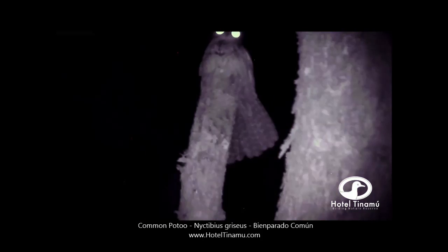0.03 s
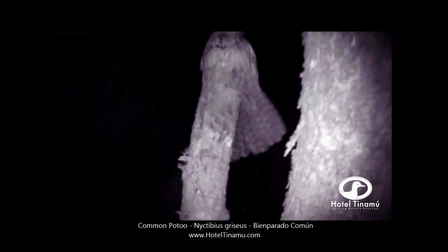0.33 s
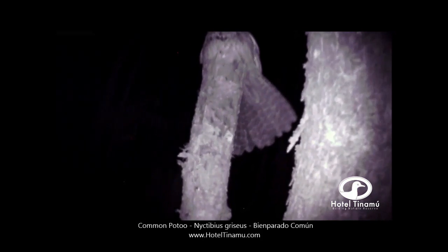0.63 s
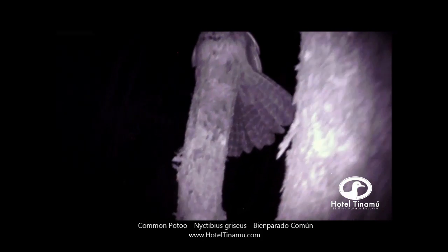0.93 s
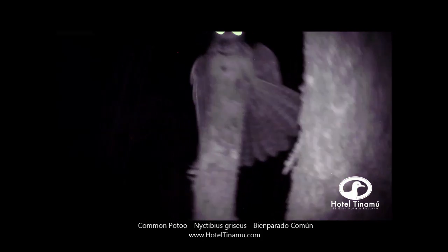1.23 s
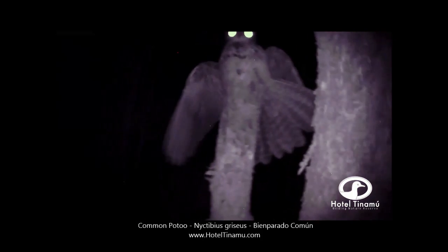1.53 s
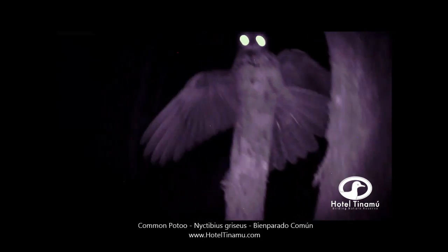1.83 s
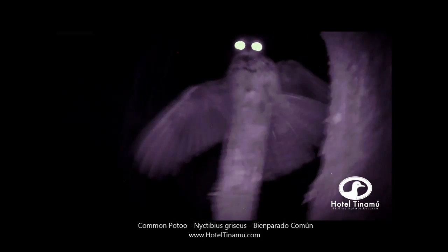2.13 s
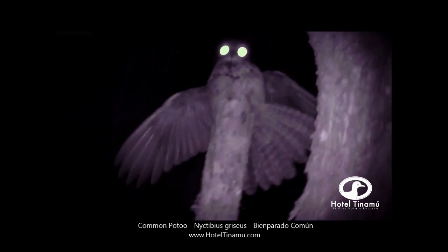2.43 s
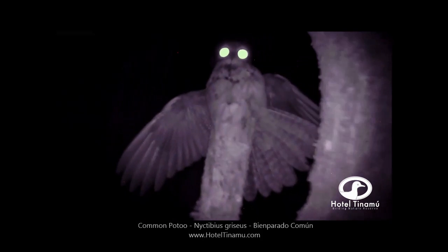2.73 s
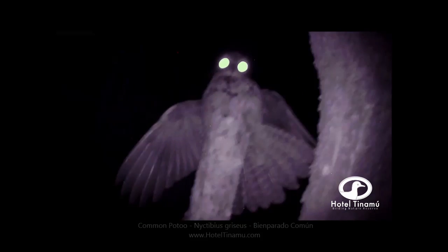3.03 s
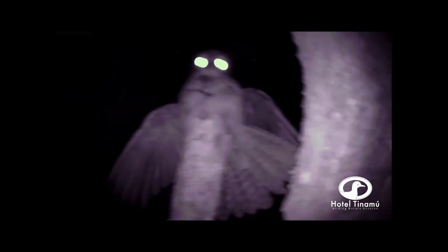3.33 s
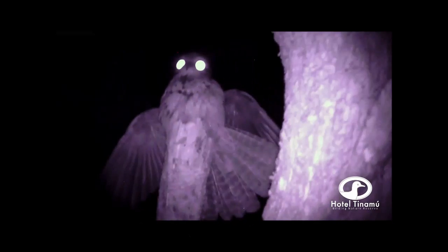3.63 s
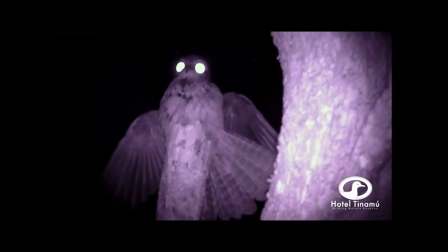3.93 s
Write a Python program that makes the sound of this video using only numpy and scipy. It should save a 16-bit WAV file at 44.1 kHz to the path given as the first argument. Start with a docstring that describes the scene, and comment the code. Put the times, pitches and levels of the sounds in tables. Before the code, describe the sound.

A night chorus of crickets and other insects, with trilling toads and soft microphone bumps.

```python
"""A tropical night. From the start, hiss, rumble and a chorus of far crickets lie under a near cricket's
chirps, a thin buzz, a tree cricket's lower trill, a scraping katydid and trilling toads. The insects
sing with their wings, and trees scatter the calls. Soon a hand starts to bump the camera softly, and
farther crickets chirp while the near one rests. Halfway, the toads stop and the tree cricket speeds up.
Then the near cricket chirps again, and at the end the buzz fades."""
import sys
import numpy as np
from scipy import signal
from scipy.fft import rfft, irfft, next_fast_len
from scipy.io import wavfile
from scipy.ndimage import uniform_filter1d, map_coordinates

SR = 44100
rng = np.random.default_rng(int(sys.argv[2]) if len(sys.argv) > 2 else 0)


def digitize_waveform(pressure):
    """Quantize a signal to 16-bit integers and store it at the path in sys.argv[1].

    Rows of a 2-D input are taken as channels; values are limited to [-1, 1].
    """
    field = np.atleast_2d(pressure).T
    bounded = np.clip(field, -1, 1)
    quanta = np.round(bounded * 32767).astype(np.int16)
    wavfile.write(sys.argv[1], SR, quanta)


N = 176400
TIME = np.arange(N) / SR


def amp(db):
    """Turn decibels into a number to multiply by."""
    return 10 ** (np.asarray(db) / 20)


def unit(x):
    """Scale a sound to an average strength (rms) of 1."""
    return x / np.sqrt(np.mean(x ** 2) + 1e-20)


def along(points, hz):
    """Read between the rows of a table on a musical (log) pitch scale."""
    pitches, values = np.transpose(points)
    return np.interp(np.log(hz + 1), np.log(pitches + 1), values)


def level(rows):
    """Join (time [s], level [dB]) points into a volume curve."""
    return amp(np.interp(TIME, *np.transpose(rows)))


def wobble(rate):
    """A smooth curve through `rate` random values a second."""
    return map_coordinates(rng.standard_normal(int(N * rate / SR) + 4), [TIME * rate])


def filtered(x, response):
    """Turn each frequency up or down by response(hz)."""
    size = next_fast_len(N + SR // 2)
    return irfft(rfft(x, size) * response(np.fft.rfftfreq(size, 1 / SR)), size)[..., :N]


# How alike left and right sound (frequency [Hz], likeness [0 to 1])
LIKENESS = [(100, 1), (300, 1), (2000, 1), (3000, 1), (4000, 1), (5500, 1), (7000, 0.37), (10000, 0.663),
            (15000, 0.765)]
def spread(pair):
    """Mix two unrelated sounds into stereo: centred low down, wider in the treble."""
    angle = lambda hz: np.arccos(np.clip(along(LIKENESS, hz), -1, 1)) / 2
    mid, side = filtered(pair, lambda hz: np.array([np.cos(angle(hz)), np.sin(angle(hz))]))
    return np.array([mid + side, mid - side])


def rush(spectrum):
    """Stereo noise with the given balance of lows and highs."""
    return unit(spread(filtered(rng.standard_normal((2, N)), lambda hz: amp(along(spectrum, hz)))))


def trees(x, echo_db, fade_s):
    """Trunks and leaves scatter a call into an echo that drops 60 dB in fade_s."""
    t = np.arange(SR) / SR
    tail = rng.standard_normal((2, SR)) * amp(-60 * t / fade_s) * (1 - np.exp(-t / .00207))
    echo = spread(signal.fftconvolve(x[None], tail, axes=1)[:, :N])
    return (x + amp(echo_db) * unit(echo) * np.std(x)) / np.hypot(1, amp(echo_db))


def pulses(times, hz, db, width_s, fall_hz, vary_db, vary_hz):
    """Tiny beeps that swell and fade, each a bit different; the pitch drops fall_hz per width_s."""
    t = np.arange(-int(3 * width_s * SR), int(3 * width_s * SR)) / SR
    size, tune, phase = rng.standard_normal((len(times), 3)).T
    cycles = (hz + vary_hz * tune)[:, None] * t - fall_hz * t ** 2 / (2 * width_s) + phase[:, None]
    wave = amp(db + vary_db * size)[:, None] * np.exp(-(t / width_s) ** 2) * np.sin(2 * np.pi * cycles)
    at = np.round((times[:, None] + t) * SR).astype(int)
    inside = (at >= 0) & (at < N)
    return np.bincount(at[inside], wave[inside], N)


def sine(hz):
    """A pure tone that follows a changing pitch."""
    return np.sin(2 * np.pi * np.cumsum(hz) / SR)


def whine(hz, waver_hz):
    """A thin tone that trembles in pitch and volume."""
    return unit(sine(hz + waver_hz * wobble(170)) * amp(3.96 * wobble(70)))


# The tone of the hiss (frequency [Hz], level [dB]). Levels in all tables are relative.
HISS_TONE = [(100, -9.5), (170, -2.5), (220, -7.5), (330, -6.5), (450, -9), (560, -10), (900, -9.5),
             (2000, -12.5), (2600, -27.5), (4400, -120)]
def hiss():
    """Soft noise with its treble cut away."""
    noise = filtered(rush(HISS_TONE), lambda hz: 1 / (1 + (hz / 2300) ** 6))
    return amp(-26.5 + 1.11 * wobble(14)) * noise


# The tone of the rumble (frequency [Hz], level [dB])
RUMBLE_TONE = [(12, -26), (28, -11), (39, -2), (47, -1.5), (60, -8), (90, -13), (140, -22), (220, -33),
               (500, -58)]
def low_rumble(hum_hz=40, waver_hz=5):
    """An even rumble around a wavering low note."""
    noise = rush(RUMBLE_TONE)
    power = np.abs(uniform_filter1d(noise ** 2, int(.15 * SR)))
    even = noise / np.sqrt(power + .1)
    hum = np.sqrt(2) * sine(hum_hz + waver_hz * wobble(16))
    return amp(-18.8) * even + amp(-21.5) * hum


# The blur of the farthest insects (frequency [Hz], level [dB])
BLUR_TONE = [(1500, -40), (2000, -6), (2850, -10.5), (3100, -3), (3400, -4), (3700, 2.5), (4200, -8),
             (4400, -0.5), (4650, -0.5), (4850, -3), (5600, -3.5), (5900, -14), (6500, -18), (8000, -18.5),
             (15500, -25.5)]
# The fizz of high-pitched insects (frequency [Hz], level [dB])
FIZZ_TONE = [(6000, -24.5), (8500, -13.5), (9800, -5.5), (11000, -6), (12300, -3), (13100, 1),
             (14000, -4.5), (15600, -6.5)]
# Their thin whines (pitch [Hz], level [dB])
WHINES = [(10368, -52), (10901, -54.5), (11316, -52.5), (11881, -46.5), (12177, -53), (12382, -53),
          (12866, -50.5)]
def insect_haze():
    """Countless insects blend into noise, with a few high whines in it."""
    blur = amp(-23 + .754 * wobble(12)) * rush(BLUR_TONE)
    fizz = amp(-30.5 + 1.17 * wobble(20)) * rush(FIZZ_TONE)
    whines = [sum(amp(db + 5) * whine(hz, waver_hz=45.3) for hz, db in WHINES) for _ in range(2)]
    return blur + fizz + spread(np.array(whines))


def trills(voices, width_s, fall_hz, swell_db, echo_db):
    """Several trilling crickets, each swelling and fading on its own."""
    out = np.zeros(N)
    for hz, rate, db in voices:
        times = (np.arange(int(rate * N / SR)) + rng.random()) / rate
        trill = pulses(times, hz, 0, width_s, fall_hz, vary_db=2, vary_hz=16.8)
        out += amp(db) * unit(trill * amp(swell_db * wobble(8)))
    return unit(trees(out, echo_db, fade_s=.28))


# Far crickets of a lower and a higher kind (pitch [Hz], pace [pulses/s], level [dB])
LOW_CRICKETS = [(3541, 71, -8.5), (3657, 98, -8.5), (3791, 105, -4.5), (3829, 101, -10), (3963, 95, -2.5)]
HIGH_CRICKETS = [(5080, 64, -1), (5194, 80, -2), (5346, 131, 2.5), (5437, 57, 0), (5571.6, 139, -1),
                 (5719, 47, -2)]
# How loud each group is (time [s], level [dB])
LOW_VOLUME = [(0, -29.5), (.3, -37.5), (.5, -25.5), (1, -25), (1.5, -24), (1.95, -24.5), (2.3, -29),
              (2.9, -30), (3.2, -30), (3.7, -29), (3.85, -30), (4, -41)]
HIGH_VOLUME = [(0.02, -27), (0.23, -34), (0.27, -27.5), (0.34, -34), (0.55, -23.5), (0.66, -33),
               (0.71, -29), (2.06, -27.5), (2.18, -27), (2.67, -27.5), (3.12, -29), (3.37, -24.5),
               (3.41, -30), (3.69, -24), (3.89, -38), (4.0, -33)]
def cricket_chorus():
    """Two groups of crickets trill far away."""
    low = trills(LOW_CRICKETS, width_s=.00244, fall_hz=59.79, swell_db=2, echo_db=-.5)
    high = trills(HIGH_CRICKETS, width_s=.00457, fall_hz=50, swell_db=1.5, echo_db=-5.5)
    return amp(1) * level(LOW_VOLUME) * low + amp(.5) * level(HIGH_VOLUME) * high


# The near cricket's chirps (start [s], level [dB])
NEAR_CHIRPS = [(-.051, -13), (.272, -13), (0.629, -13.5), (2.617, -12), (2.976, -13.5), (3.366, -12.5),
               (3.747, -15)]
def near_cricket(strokes=12, strokes_per_s=103, start_hz=3850, rise_hz=140, rise_s=.035):
    """Each chirp is a dozen wing strokes that climb in pitch and strength."""
    out = np.zeros(N)
    age = np.arange(strokes) / strokes_per_s
    climb = 1 - np.exp(-age / rise_s)
    for start, db in NEAR_CHIRPS:
        times = start + age + rng.normal(0, .0005, strokes)
        out += pulses(times, start_hz + rise_hz * climb, db + 5.6 + climb,
                      width_s=.0029, fall_hz=95.3, vary_db=.8, vary_hz=22)
    return trees(out, echo_db=-6, fade_s=.27)


# The tones in the buzz (distance from the main pitch [stroke rates], level [dB])
BUZZ_TONES = [(-2, -0.5), (-1, 2), (0, 2.5), (1, -6), (2, -24)]
# How loud the buzz is (time [s], level [dB])
BUZZ_VOLUME = [(0, -26), (.14, -33), (.2, -38), (1.1, -39.5), (1.22, -31), (1.42, -32), (1.56, -33),
               (1.76, -29.5), (2.6, -34.5), (3.3, -31.5), (3.55, -31.5), (3.65, -42.5), (4, -50)]
def buzzing_insect(hz=4191, strokes_per_s=182):
    """Very fast, even wing strokes make one thin note with extra tones on either side."""
    cycles = np.cumsum(hz + 4 * wobble(5) + 12 * wobble(120)) / SR
    tone = sum(amp(db) * np.sin(2 * np.pi * (cycles + round(step) * strokes_per_s * TIME + rng.random()))
               for step, db in BUZZ_TONES)
    return unit(tone) * level(BUZZ_VOLUME) * amp(8)


# Small crickets' notes (start [s], length [s], pitch [Hz], level [dB])
HELD_NOTES = [(0, 0.353, 5504, -33), (0, 0.505, 5180, -33), (0.452, 0.185, 4970, -28),
              (1.431, 0.237, 5563, -29), (2.058, 0.395, 5502, -27), (2.07, 0.45, 4985, -30),
              (3.27, 0.126, 5050, -36.5), (3.533, 0.227, 4986, -30)]
def small_crickets(edge_s=.0058):
    """Small crickets hold a thin note for a moment, then rest."""
    out = np.zeros(N)
    for start, length, hz, db in HELD_NOTES:
        on_off = np.clip(np.minimum(TIME - start, start + length - TIME) / edge_s, 0, 1)
        out += amp(db) * on_off * whine(hz, waver_hz=31.56)
    return trees(out, echo_db=-4.5, fade_s=.23)


# How fast the tree cricket trills (time [s], pace [pulses/s])
TRILL_PACE = [(0, 28.9), (.5, 27.8), (1.7, 27.65), (2.1, 29.4), (2.5, 32), (3.4, 32.3), (4, 31.2)]
def tree_cricket(start_s=.0010075):
    """A trill that quickens halfway; each pulse falls into a softer, lower tail."""
    beats = np.cumsum(np.interp(TIME, *np.transpose(TRILL_PACE))) / SR
    times = start_s + np.searchsorted(beats, np.arange(int(beats[-1]) + 1)) / SR
    heads = pulses(times, hz=2235, db=-16.8, width_s=.00515, fall_hz=56.6, vary_db=.5, vary_hz=22.5)
    tails = pulses(times + .0115, hz=2129.5, db=-23.3, width_s=.00718, fall_hz=30, vary_db=2, vary_hz=13.6)
    return trees(heads + tails, echo_db=-4.5, fade_s=.34)


# The wing strokes in one katydid call (delay [s], length [s], level [dB])
SCRAPES = [(.002, 0.024, -28.5), (0.036, .026, -29), (0.062, .016, -37.5)]
def katydid(calls_per_s=11.094, start_hz=12200, end_hz=10100, teeth_per_s=1700, swell_db=5):
    """Each stroke drags a row of teeth over a scraper: tiny rings that grow louder and lower."""
    calls = np.arange(int(calls_per_s * N / SR) + 1) / calls_per_s
    # A click ends the first stroke.
    out = pulses(calls + .022, end_hz, db=-23, width_s=.00051, fall_hz=300, vary_db=-.5, vary_hz=150)
    for delay, length, db in SCRAPES:
        progress = rng.random((len(calls), int(teeth_per_s * length)))
        times = calls[:, None] + delay + length * progress
        pitches = start_hz + (end_hz - start_hz) * progress ** .68
        levels = db + 4.5 + swell_db * (progress - 1)
        out += pulses(times.ravel(), pitches.ravel(), levels.ravel(),
                      width_s=.0004, fall_hz=30, vary_db=.5, vary_hz=709)
    return trees(out, echo_db=-1.5, fade_s=.135)


# How loud the toads are (time [s], level [dB])
TOAD_VOLUME = [(0, -22.5), (.55, -20), (1.9, -18), (2.03, -22.5), (2.13, -29), (2.3, -53.5)]
def toads(start_s=.031, pulses_per_s=12.25, crowd_per_s=49):
    """One toad's slow, hollow trill, filled in by its neighbours' quicker, looser pulses."""
    times = start_s + np.arange(int(pulses_per_s * N / SR)) / pulses_per_s
    call = pulses(times, hz=776.8, db=0, width_s=.016, fall_hz=22, vary_db=1.2, vary_hz=8)
    call += pulses(times + .04, hz=690, db=-7, width_s=.014, fall_hz=12.8, vary_db=1.5, vary_hz=6.5)
    loose = np.arange(0, N / SR, 1 / crowd_per_s)
    loose += rng.normal(0, .005, len(loose))
    crowd = pulses(loose, hz=765, db=0, width_s=.00443, fall_hz=13.5, vary_db=1.2, vary_hz=50)
    together = unit(unit(call) + amp(1) * unit(crowd))
    return trees(together * level(TOAD_VOLUME) * amp(-4.2), echo_db=-7, fade_s=.323)


# Soft bumps (time [s], pitch [Hz], width [s], level [dB])
HAND_BUMPS = [(0.149, 99, 0.0105, -3.5), (.985, 43.4, 0.0283, -4.5), (1.966, 88.4, 0.0135, -2.5),
              (2.406, 98.2, 0.0116, -10.5), (2.894, 55, .011, -5), (3.708, 85, .018, -7),
              (3.80, 77.6, 0.0183, -6), (3.866, 130, .006, -4.5)]
# Small ticks (time [s], rough pitch [Hz], level [dB])
HAND_TICKS = [(2.374, 834, -11), (3.643, 550, -28.5), (3.863, 480, -15), (3.94, 880, -20.5)]
def handling():
    """A hand on the camera makes dull bumps (short low tones) and ticks (bursts of noise)."""
    out = np.zeros(N)
    for at, hz, width, db in HAND_BUMPS:
        t = TIME - at
        out += amp(db) * np.exp(-np.abs(t / width) ** 1.14) * np.cos(2 * np.pi * hz * t)
    for at, hz, db in HAND_TICKS:
        noise = unit(filtered(rng.standard_normal(N), lambda f: 1 / (1 + (f / (1.55 * hz)) ** 8)))
        out += amp(db) * noise * np.exp(-np.abs(TIME - at) / .00498)
    return out


# Chirps from farther off (start [s], length [s], pitch [Hz], pace [strokes/s], level [dB])
DISTANT_CHIRPS = [(.435, .08, 3820, 100, -19), (.97, .11, 3833, 100, -18), (1.12, .06, 3883, 117.5, -17.5),
                  (1.31, .10, 3850, 94, -16), (1.45, .07, 3804, 111, -17), (1.78, .08, 3794, 101, -17),
                  (2.07, .09, 3940, 91, -22), (2.26, .08, 3763, 117, -21), (2.41, .06, 3827, 109.6, -21),
                  (3.10, .12, 3773, 90.7, -17.5)]
def far_chirps():
    """Crickets deeper in the trees chirp with short runs of wing strokes."""
    out = np.zeros(N)
    for start, length, hz, rate, db in DISTANT_CHIRPS:
        times = start + np.arange(int(length * rate) + 1) / rate
        out += pulses(times, hz, db + 2.5, width_s=.00369, fall_hz=70, vary_db=1, vary_hz=25)
    return trees(out, echo_db=-3.5, fade_s=.183)


# How the background swells and dips (time [s], level [dB])
SWAY = [(0.02, -40), (0.22, -42), (0.27, -38.5), (0.34, -43), (0.61, -35), (0.62, -40), (1.31, -37.5),
        (1.32, -40.5), (1.4, -37.5), (1.76, -38.5), (2.41, -38), (2.95, -40.5), (3.38, -37.5),
        (3.43, -42.5), (3.49, -39.5), (3.7, -39), (3.78, -40), (3.82, -45.5), (3.85, -43.5), (3.88, -48.5),
        (3.95, -43), (4.0, -42.5)]
def scene():
    """Add it all up; the background, katydid and tree cricket swell and dip together."""
    sway = level(SWAY) / np.mean(level(SWAY)) * amp(.482 * wobble(25.086))
    steady = sway * (hiss() + insect_haze() + katydid()) + sway ** .92 * (low_rumble() + tree_cricket())
    callers = cricket_chorus() + near_cricket() + buzzing_insect() + small_crickets() + toads()
    return steady + callers + handling() + far_chirps()


CEILING, TOP_HZ = .97, 15720
def record(dry):
    """Round off the tallest peaks and cut the very highest treble."""
    rounded = dry / (1 + np.abs(dry / CEILING) ** 10) ** (1 / 10)
    return filtered(rounded, lambda hz: hz < TOP_HZ)


dry = scene()
out = record(dry)
digitize_waveform(out)
```